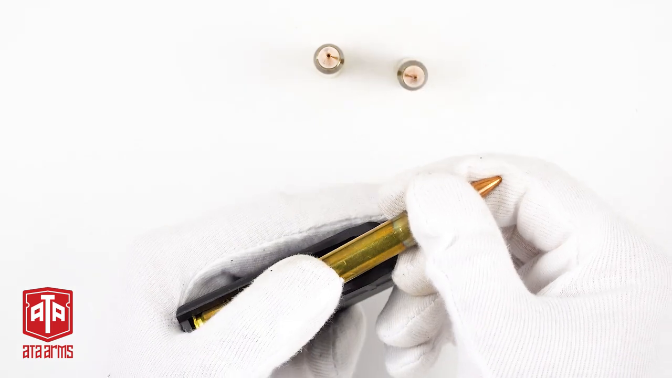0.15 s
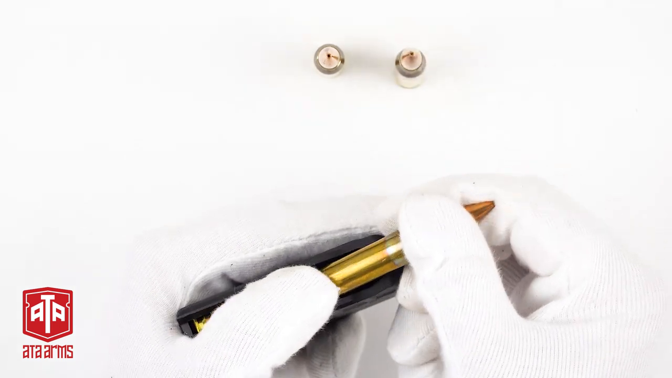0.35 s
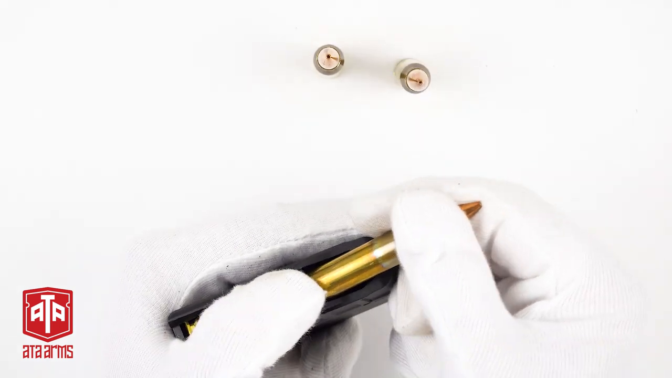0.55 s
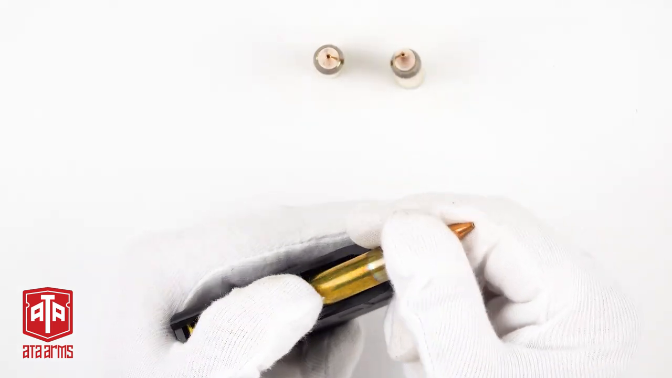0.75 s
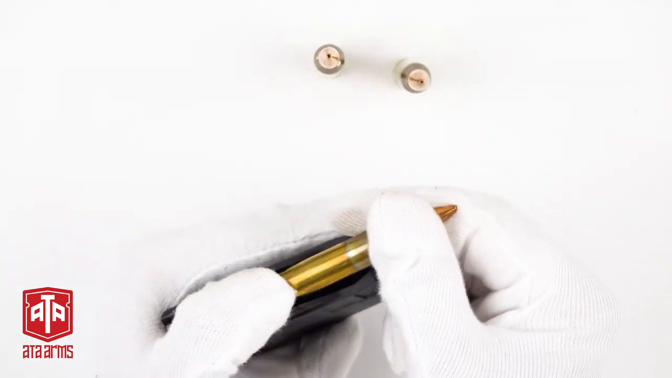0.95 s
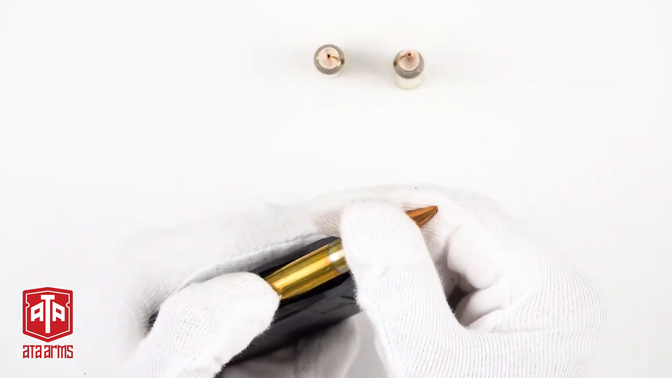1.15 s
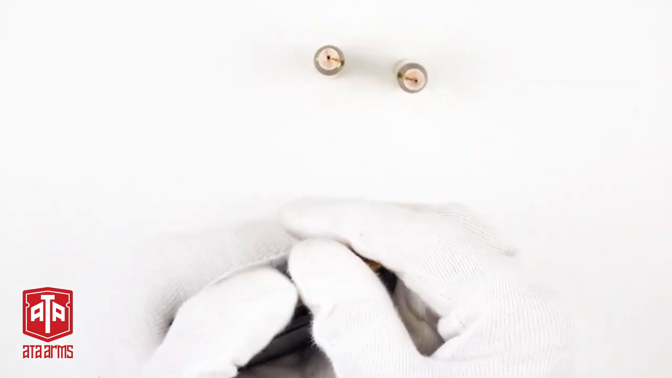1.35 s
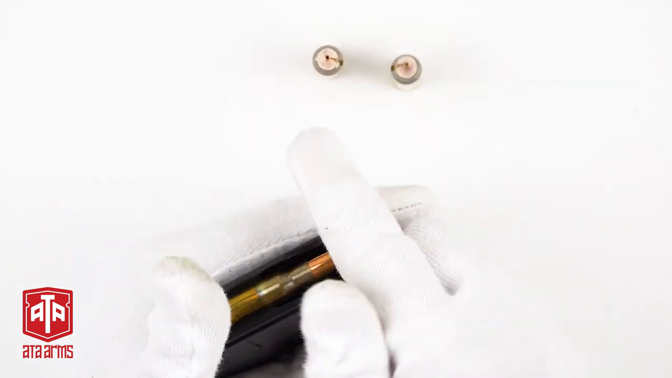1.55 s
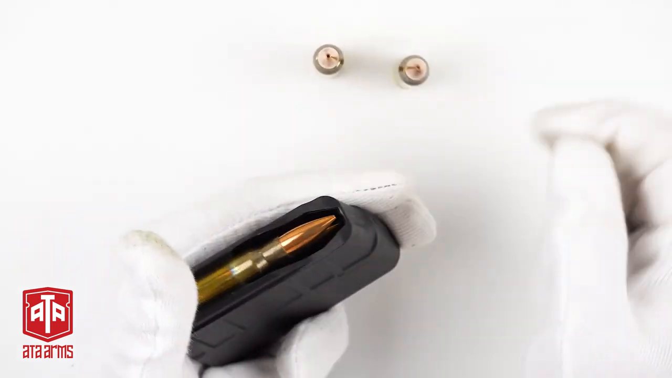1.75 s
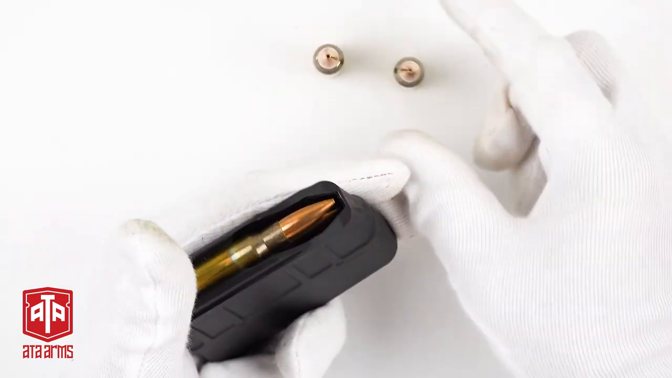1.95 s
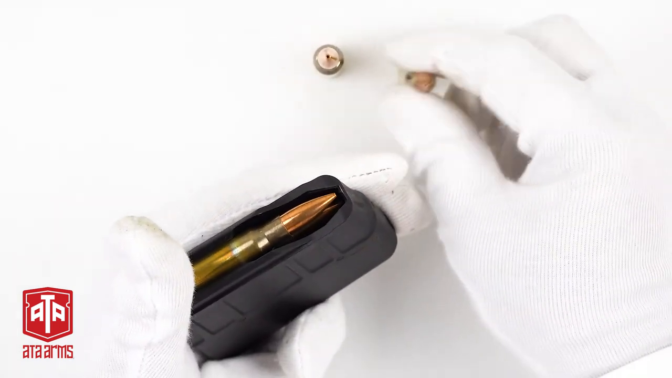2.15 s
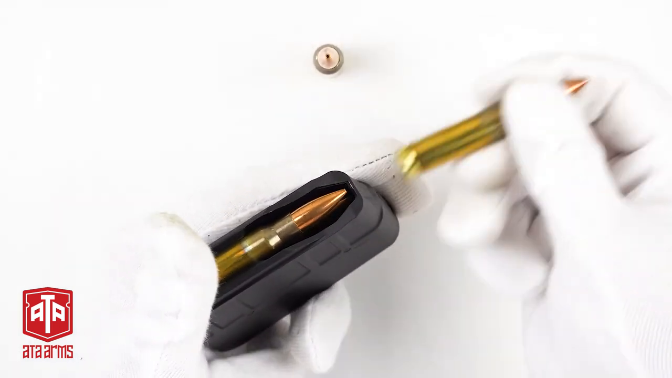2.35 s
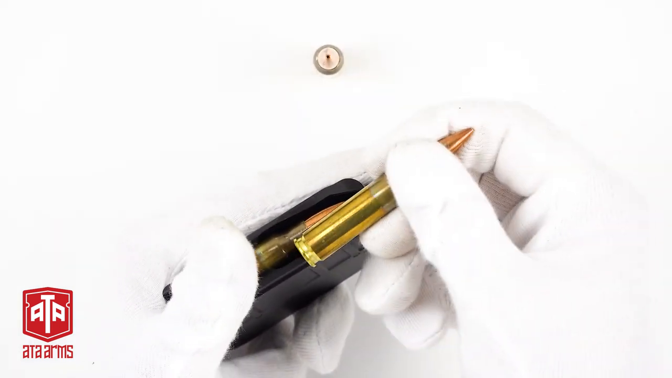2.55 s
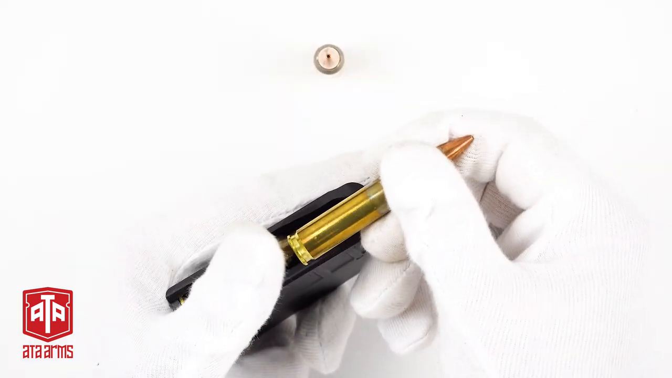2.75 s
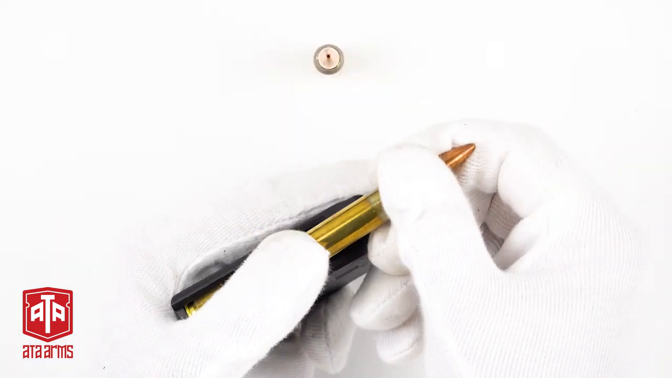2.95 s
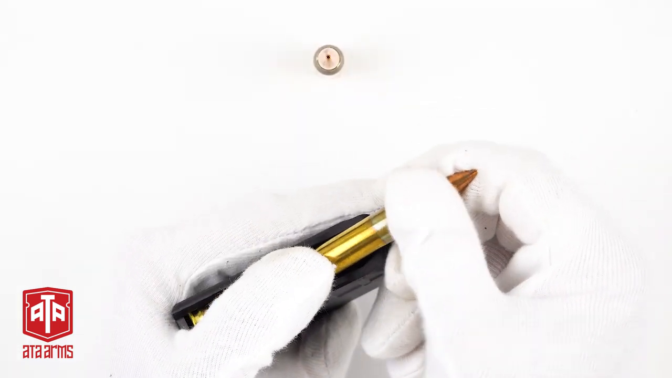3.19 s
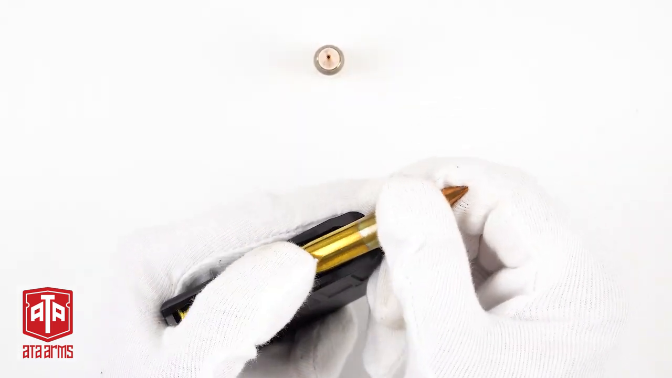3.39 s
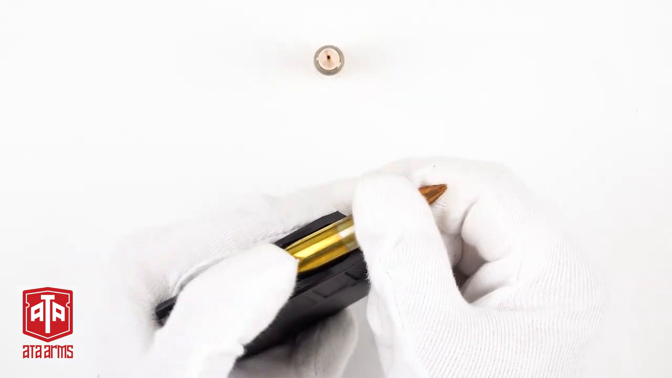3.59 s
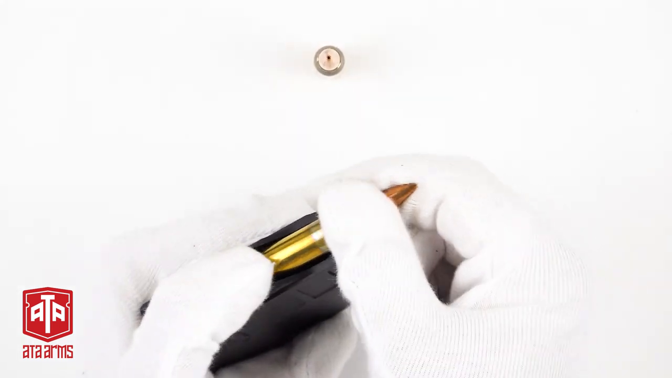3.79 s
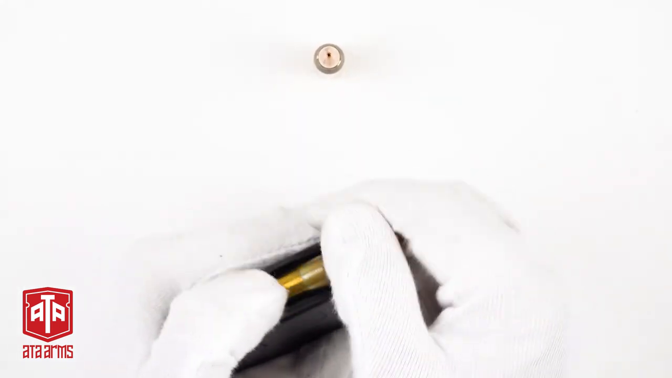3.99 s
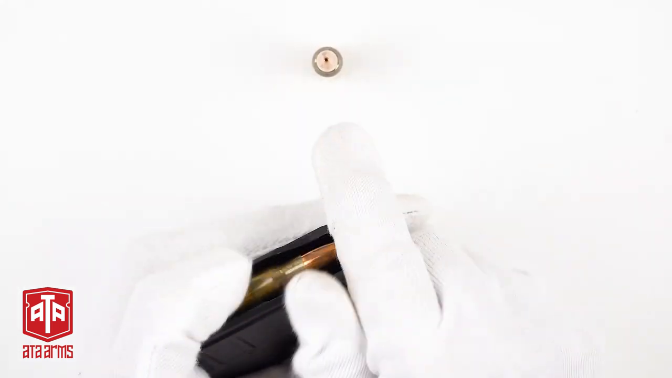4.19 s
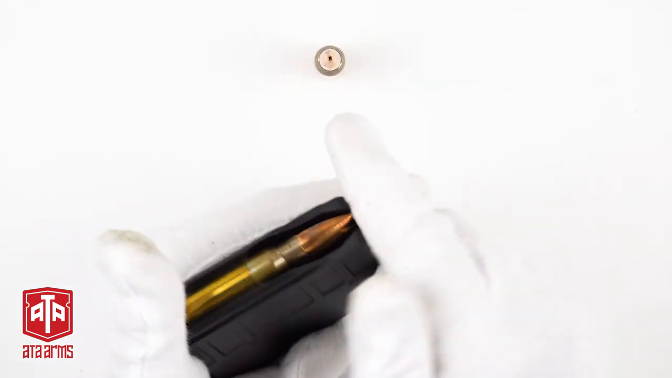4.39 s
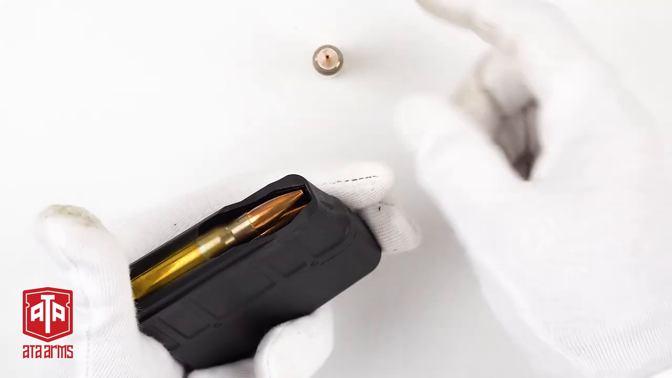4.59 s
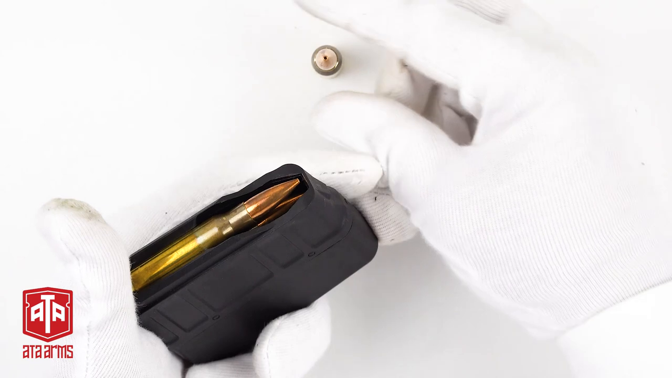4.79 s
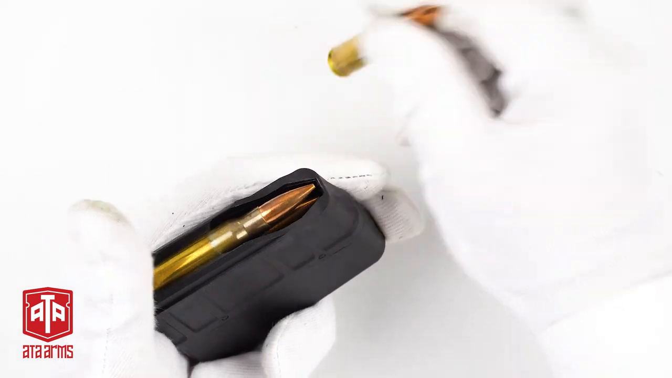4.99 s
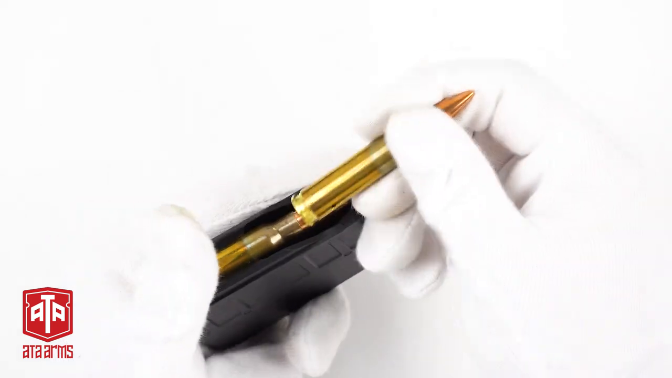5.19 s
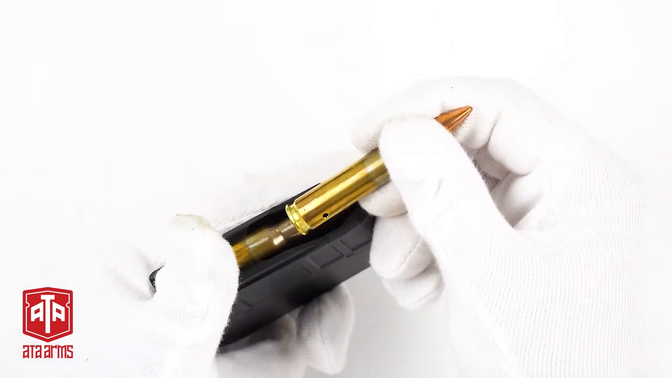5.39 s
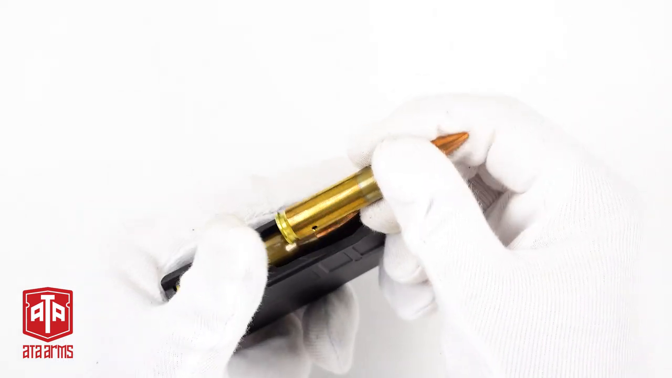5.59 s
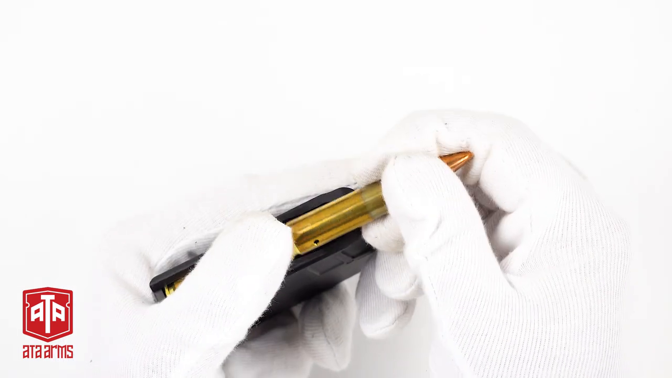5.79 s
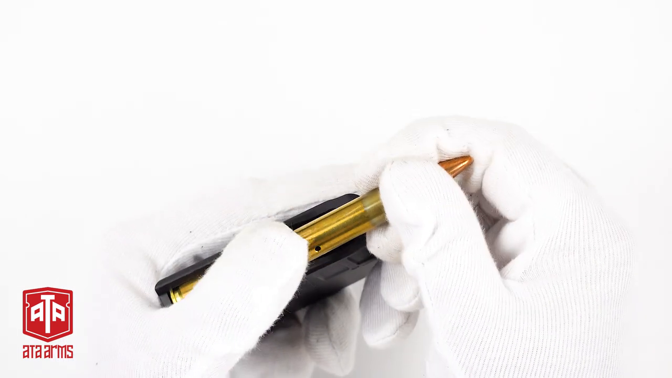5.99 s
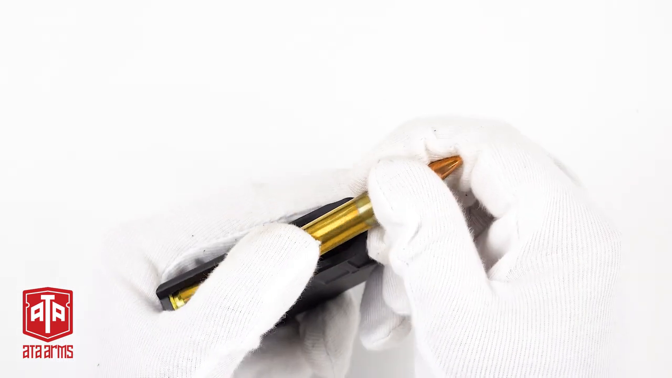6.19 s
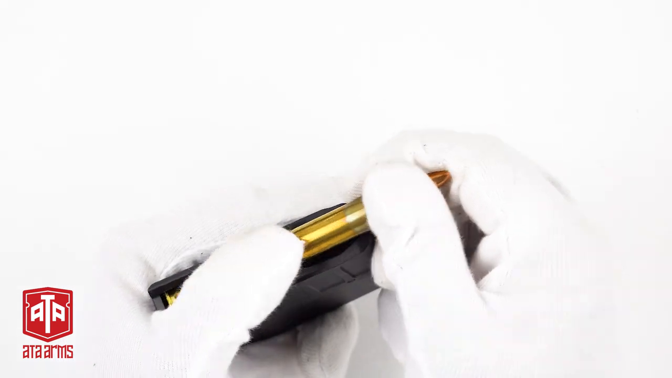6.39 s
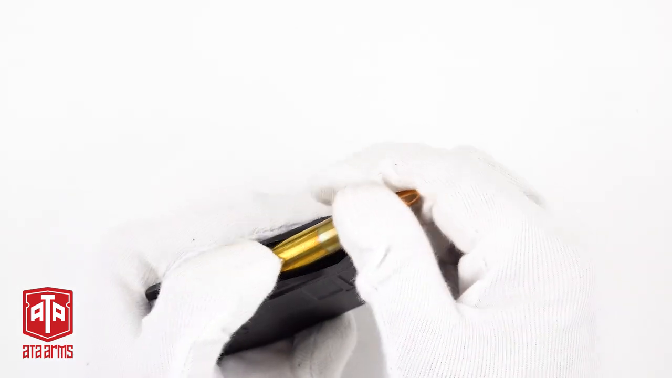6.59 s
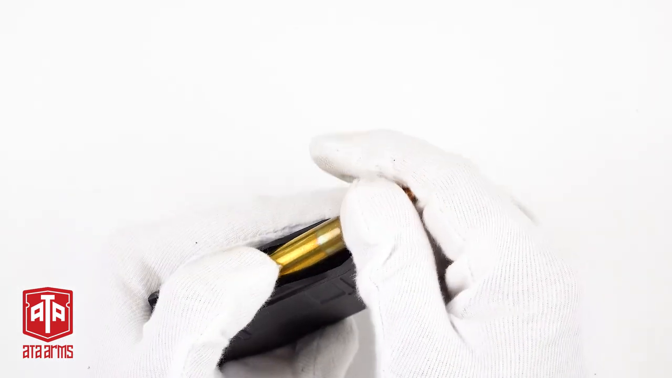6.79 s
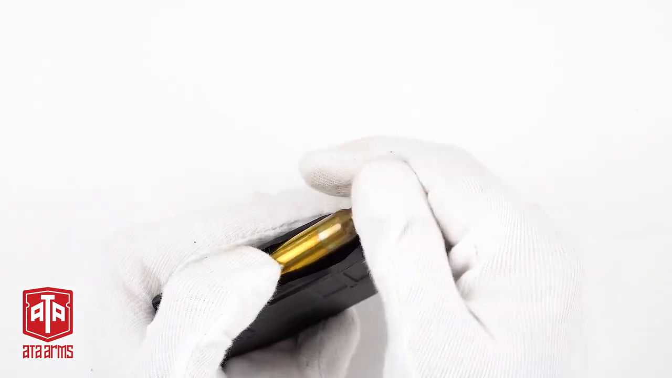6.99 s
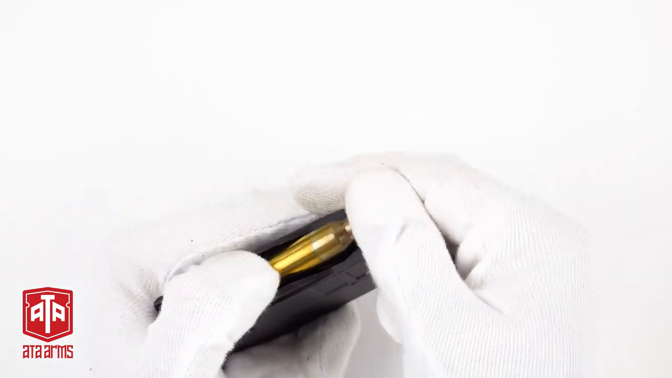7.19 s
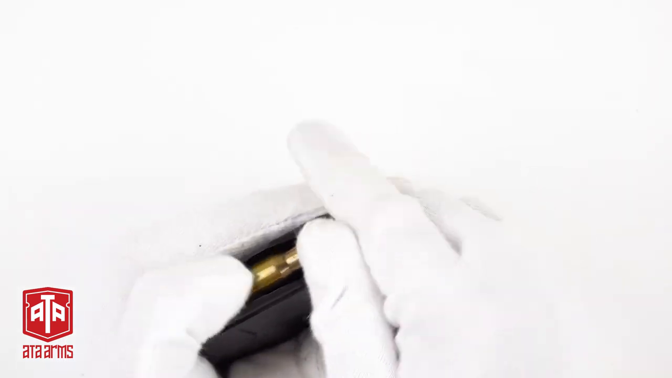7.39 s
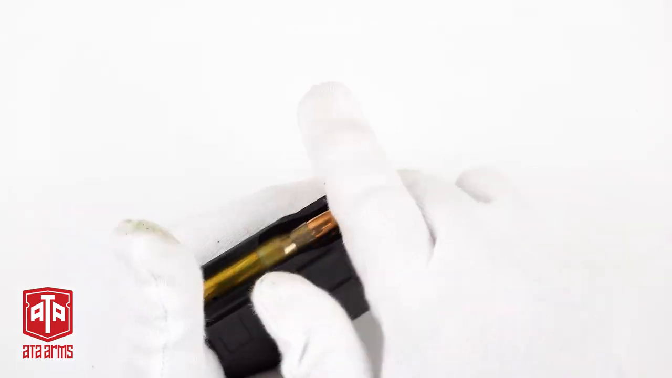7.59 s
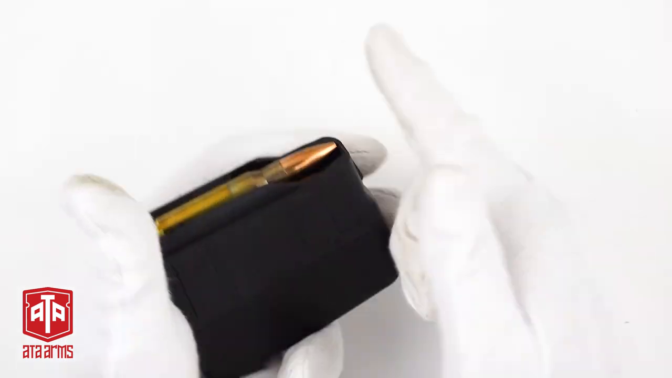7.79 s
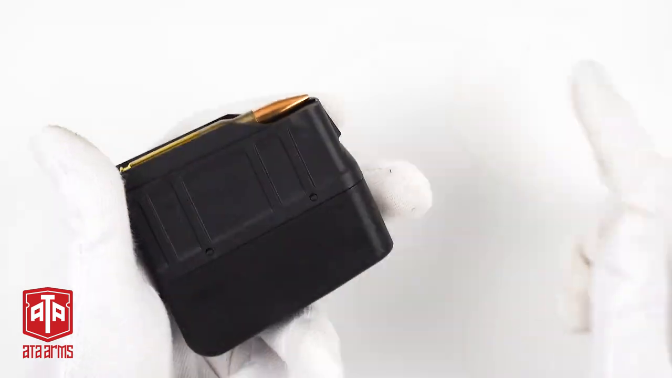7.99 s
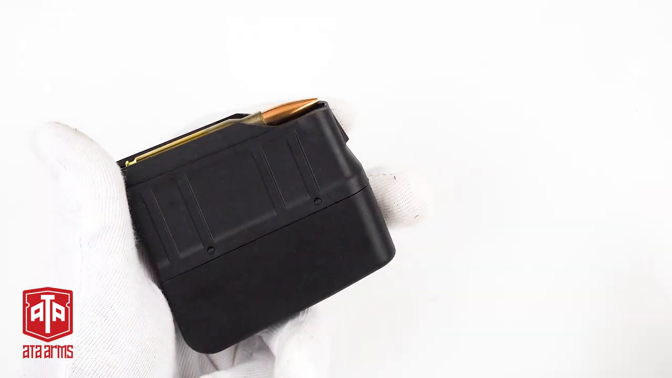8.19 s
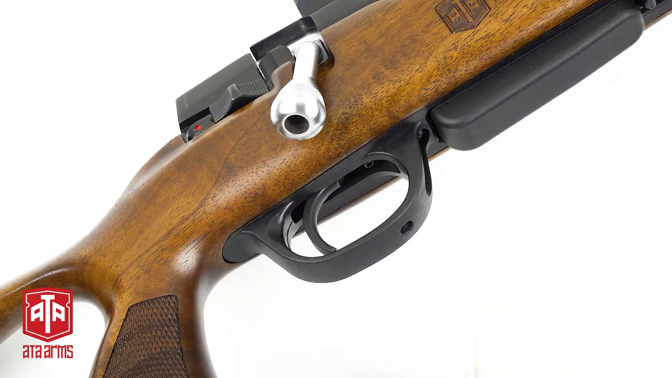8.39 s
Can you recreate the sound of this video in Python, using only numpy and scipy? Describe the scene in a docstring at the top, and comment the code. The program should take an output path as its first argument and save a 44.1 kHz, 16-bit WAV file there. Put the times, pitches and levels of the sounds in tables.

```python
"""In a small room, three brass rifle cartridges are pressed one by one into a hand-held plastic magazine.
Cases tick, click, scrape and snap home: random blows or stick-slip forces excite the magazine's resonances.
Light brass rubs and loose bumps ring in a few modes; soft knocks are filtered noise, and pushes ring the table.
Gloves rustle and hands rumble as coloured noise over a steady room tone with a faint hum.
A soft rush swells, gains a hiss and stops at the end."""
import sys
import numpy as np
from scipy import signal
from scipy.fft import rfft, irfft, next_fast_len
from scipy.io import wavfile
from scipy.ndimage import uniform_filter1d, map_coordinates

SR = 44100
rng = np.random.default_rng(int(sys.argv[2]) if len(sys.argv) > 2 else 0)


def store_pcm(level_fs):
    """Save levels as 16-bit WAV."""
    pcm = np.round(np.clip(level_fs, -1, 1) * 32767).astype(np.int16)
    wavfile.write(sys.argv[1], SR, np.atleast_2d(pcm).T)


N = 372644

# The five registers, from hollow body through wall, clack and brass ring to sharp edge.
# Each row: lower limit in Hz, upper limit in Hz.
REGISTERS = [(400, 1100), (1100, 1900), (1900, 4300), (4300, 7600), (7600, 15600)]
# The pushes of the hands that reach the table. Each row: start in seconds, relative level in dB.
THUMPS = [(0.987, -41), (1.274, -29), (1.39, -36), (3.657, -34), (3.959, -29), (4.028, -35), (6.501, -35),
          (6.637, -35.5), (7.219, -33.5), (7.349, -37.5), (7.76, -46.5)]


def contacts(rise=0.0006, blow_t60=0.013, rattle_t60=0.043, rattle=0.5, loose_calm=0.35):
    """Impact excitation: a hard blow of about 2 ms and a short rattle of the stack, less for a loose case."""
    # Hard contacts of a case with the lips, the spring or the stack; the spot struck favours two resonances,
    # hardness lifts the treble, body the hollow of the shell. Each row: time in seconds, strength in dB,
    # clack in Hz, ring in Hz, hardness in dB, body in dB.
    blows = [(0.028, -47.5, 3400.0, 4640, 3, 0.5), (0.2, -48, 3370, 4250.0, 1.0, 7.0),
             (0.22, -50, 1610, 7760, 10.5, 14.5), (0.3011, -37.5, 1540.0, 4370, 10.0, 6),
             (0.308, -41.5, 1520, 4530, 15, 15), (0.568, -53, 2430, 4350.0, -16, 5),
             (0.9606, -36.5, 2630, 5350.0, -6, 10.5), (0.99, -26.5, 2630, 4180, 11.5, 8),
             (1.2748, -17.5, 2590, 4530.0, -2.5, -5.5), (1.2788, -18, 3830, 4270, 3.5, -5.5),
             (1.3046, -25.0, 2540, 4140, 6.5, -0.5), (1.384, -33.5, 1610.0, 4590.0, -1, 1.5),
             (1.417, -30.5, 2010.0, 5800, -3.5, 6.5), (1.4936, -47.0, 2230.0, 4310.0, 2, 20.5),
             (2.6416, -27.0, 1830.0, 5320.0, -10.5, -3.5), (2.698, -28.0, 2780, 6270, 15.5, -2),
             (3.067, -34, 2510, 4410, -3.0, 3), (3.2723, -50.5, 2450, 5090, -13.0, 12.5),
             (3.537, -41, 1030, 7220.0, 8, 15.5), (3.6656, -27.0, 2980.0, 4740.0, 6, -10.5),
             (3.786, -56.5, 1030, 4360, 16, 22.5), (3.8386, -49.5, 2340.0, 4640.0, 6.5, 9),
             (3.8784, -50.0, 2350, 4500.0, -0.5, 15.0), (3.9579, -16.5, 2460.0, 5900, 2, -6.5),
             (3.964, -18.5, 3386, 6196, 11, 5.5), (3.9704, -20.5, 1560.0, 5810.0, 1, 7.0),
             (3.99, -16.0, 2220, 6000.0, -7.0, -3), (3.9947, -28.5, 2420.0, 6100, 5, 12.5),
             (4.116, -39.5, 2350, 5780.0, -1.5, 2.5), (5.311, -28, 2350, 5600.0, 11.0, 0.5),
             (5.3621, -25.5, 2350, 5660, -5, -11), (5.4909, -46.5, 2700, 4290, 11.0, 0),
             (5.609, -27, 2430, 5790, 16, -3), (5.688, -39.5, 2410, 5820.0, -21.0, 2.5),
             (5.9218, -48, 2370.0, 5640.0, -18.5, 8.5), (6.216, -39.0, 3050, 5820.0, -9, 1),
             (6.2473, -43.5, 1270.0, 4650.0, -5, 6.5), (6.3098, -24.0, 2490, 4830, 2, -5.5),
             (6.355, -35.5, 2570, 4690.0, -14, 9.0), (6.469, -38, 3260, 4400, 5.5, -4),
             (6.628, -47, 1170.0, 4750.0, 3, 11.5), (6.648, -22.5, 2400, 5930, -3.5, -3),
             (7.2225, -14.0, 3080, 8400, 11.5, -8.5), (7.225, -15.5, 3080, 8270.0, 5, -7.5),
             (7.259, -24.5, 3090.0, 6100.0, 2, -1.0), (7.3302, -24, 2230, 4370, 4, 5),
             (7.334, -25, 2050, 5080.0, 2, 2), (7.3587, -25.0, 3160, 4380, 7, 1.0)]
    track, t = np.zeros(N), seconds(0.04)
    for s, strength_db, clack_hz, ring_hz, hardness_db, body_db in blows:
        loose = looseness(s)
        stack = rattle * (1 - loose_calm * loose) * amp(-60 * t / rattle_t60)
        envelope = (1 - np.exp(-t / rise)) * (amp(-60 * t / blow_t60) + stack)
        levels_db = voiced(strength_db, clack_hz, ring_hz, hardness_db, body_db)
        click = magazine(chatter(envelope), levels_db, 0.01, loose, (clack_hz, ring_hz))
        add(track, s - rise, in_room(click, wet_db=0.5))
    return track


def magazine(force, levels_db, length, loose, favoured_hz=(), favour_db=8, wall_db=-12, clearing_db=13, count=3):
    """Source-filter principle: a force excites the body's modes, with a set energy in each register."""
    # Resonances of the loaded magazine. Each row: frequency in Hz, half-width in Hz, level in dB.
    body_modes = [(752, 130, -0.5), (1134, 130, -6.5), (1360, 220, -2), (1580, 93, -2.5), (2020, 270, -2.5),
                  (2426, 290, -1), (3078, 75, -1.5), (3400, 180, -1.5), (3820, 240, -3), (4602, 370, -5.5),
                  (5300, 530, -5), (5830, 270, -2), (6420, 160, -2), (6990, 200, -1.5), (8080, 370, -1),
                  (8980, 820, -5), (10130, 370, -6), (11570, 320, -7.5), (12400, 330, -2.5),
                  (14700, 480, -8.5)]
    f = np.fft.rfftfreq(2048, 1 / SR)
    modes = list(body_modes) + [(hz, 160, favour_db * loose) for hz in favoured_hz]
    hz, width, db = np.transpose(modes)[:, :, None]
    # every contact finds the modes slightly shifted
    pitch = hz * (1 + 0.012 * rng.standard_normal(hz.shape))
    strength = amp(db + 2.5 * rng.standard_normal(hz.shape))
    power = np.sum(strength ** 2 / (1 + ((f - pitch) / width) ** 2) ** 2, axis=0)
    # a pressed case cracks without pitch
    power += amp(wall_db - clearing_db * loose) ** 2 / (1 + (f / 7000) ** 2)
    # so small a body radiates little bass
    power *= f ** 4 / (f ** 4 + 380 ** 4)
    wanted = amp(levels_db) ** 2 * length * SR
    centres = np.sqrt(np.prod(REGISTERS, axis=1))
    for _ in range(count):  # tilt the spectrum smoothly to bring each register towards its energy
        held = np.array([power[(f >= low) & (f < high)].sum() for low, high in REGISTERS]) / len(f)
        power *= np.exp(along(np.transpose([centres, np.log(wanted / held)]), f))
    return signal.fftconvolve(force / np.linalg.norm(force), causal(np.sqrt(power)))


def voiced(strength_db, clack_hz, ring_hz, hardness_db, body_db):
    """Contact spectrum: strength, hardness and body set the level of each register in dB."""
    # One row for each register: base level in dB at the usual strength, growth in dB per dB of strength,
    # share of hardness, share of body.
    voicing = [(-40.5, 1, 0, 1), (-40, 1.25, 0.029, 0.77), (-30.5, 1, 0, 0), (-45.5, 1, 0.9, 0),
               (-48.5, 1, 1.07, 0)]
    usual_strength_db = -30
    # a favoured resonance lifts the register around it
    clack_lift_db, ring_lift_db, lift_octaves = 2.5, 9.5, 0.52
    base_db, growth, hard, hollow = np.transpose(voicing)
    centres = np.sqrt(np.prod(REGISTERS, axis=1))

    def near(hz):
        return np.exp(-(np.log2(centres / hz) / lift_octaves) ** 2)

    levels_db = base_db + growth * (strength_db - usual_strength_db)
    levels_db = levels_db + hard * hardness_db + hollow * body_db
    return levels_db + clack_lift_db * near(clack_hz) + ring_lift_db * near(ring_hz)


def looseness(s):
    """Contact damping: the grip exponentially reduces how freely the case can ring at time s (0-1)."""
    # Each cartridge is laid on loosely, then gripped by the thumb.
    # Each row: time laid in seconds, time gripped in seconds.
    cartridges = [(0, 0.028), (2.6, 2.85), (5.25, 5.8)]
    grip_s, pressed_looseness = 0.52, 0.12  # time constant in seconds, lower limit
    _, gripped = cartridges[sum(s >= row[0] for row in cartridges[1:])]
    free = np.exp(-max(s - gripped, 0) / grip_s)
    return np.clip(pressed_looseness + (1 - pressed_looseness) * free, 0, 1)


def chatter(envelope, count=2):
    """Broadband excitation: a random force follows the envelope with a nearly flat spectrum."""
    force = rng.standard_normal(len(envelope)) * envelope
    for _ in range(count):
        force = irfft(np.exp(1j * np.angle(rfft(force))), len(envelope))  # keep phase, level the spectrum
        force *= envelope / np.sqrt(np.abs(uniform_filter1d(force ** 2, size=48)) + 1e-14)
    return force


def bumps(rise=0.00038):
    """Modal ringing: a loosely held cartridge sounds briefly in a few decaying sines."""
    # The last cartridge bumps on the one below. Each row: start in seconds, level in dB.
    touches = [(5.312, -25), (5.363, -26.5), (5.4914, -33.5)]
    # Modes of the case. Each row: frequency in Hz, level in dB, decay time t60 in seconds.
    case_modes = [(1097, 0.5, 0.022), (2704, 0.5, 0.03), (4400, -3.5, 0.029)]
    track, t = np.zeros(N), seconds(0.1)
    for s, db in touches:
        ring = np.zeros(len(t))
        for hz, level, t60 in case_modes:
            ring += amp(level + rng.normal(0, 1) - 60 * t / t60) * np.sin(2 * np.pi * hz * t)
        add(track, s, in_room(amp(db) * ring * (1 - np.exp(-t / rise)), wet_db=-4.5))
    return track


def scrapes(grit_db=3.5, roundness=0.55):
    """Stick-slip friction: sliding brass gives a dense run of tiny blows of uneven size."""
    # A case slides under the lips. Each row: start in seconds, length in seconds, strength in dB,
    # hardness in dB, body in dB.
    slides = [(0.331, 0.11, -57.0, 0.5, 8), (0.727, 0.062, -69, -3.5, 19.0), (0.977, 0.012, -39, 5.5, -8.5),
              (1.265, 0.033, -27.5, 8.5, 6), (1.295, 0.018, -27.0, 7, 3.5), (3.094, 0.11, -59.5, 8, 15),
              (3.517, 0.028, -53, 7.0, 18), (3.659, 0.018, -33, -1, -7), (3.686, 0.066, -55.5, 7, 11),
              (3.78, 0.088, -58, 8.5, 10.0), (3.949, 0.044, -26, 5.5, 2), (6.503, 0.024, -47.5, 12.5, 10.5),
              (6.641, 0.0085, -41.5, -1.5, 12.0), (7.2168, 0.023, -25.0, 10.5, 3.5),
              (7.238, 0.052, -27.5, 13.5, 2.5)]
    clack_hz, ring_hz = 2500, 4440  # the resonances that sliding favours
    track, t = np.zeros(N), seconds(0.16)
    for s, length, strength_db, hardness_db, body_db in slides:
        slips = amp(grit_db * unit(uniform_filter1d(rng.standard_normal(len(t)), size=60)))
        pressure = np.abs(np.sin(np.pi * np.minimum(t / length, 1))) ** roundness
        levels_db = voiced(strength_db, clack_hz, ring_hz, hardness_db, body_db)
        slide = magazine(chatter(slips * pressure), levels_db, length, looseness(s))
        add(track, s, in_room(slide, wet_db=3.5))
    return track


def squeaks(sharpness=14):
    """Friction-driven resonance: a light rub excites one narrow band of the case."""
    # Brass rubs lightly on brass. Each row: start in seconds, length in seconds, level in dB, pitch in Hz.
    rubs = [(4.208, 0.061, -55, 3320), (5.784, 0.039, -61, 3440), (5.85, 0.067, -58.5, 3280),
            (7.112, .012, -59, 3530)]
    track, t = np.zeros(N), seconds(0.1)
    for s, length, db, pitch_hz in rubs:
        rub = rng.standard_normal(len(t))
        tone = unit(filtered(rub, lambda hz: 1 / (1 + (sharpness * (hz / pitch_hz - 1)) ** 2)))
        pressure = np.sin(np.pi * np.minimum(t / length, 1))
        add(track, s, in_room(amp(db) * tone * pressure, wet_db=-0.5))
    return track


def knocks(rise=0.002, t60=0.045, sharpness=5.3, tick=0.17, tick_t60=0.015, echo_s=0.012, echo=0.55):
    """Damped resonance: soft contacts give a dull tick and a puff with an early echo and much room."""
    # Each row: start in seconds, relative level in dB, pitch in Hz.
    soft_contacts = [(0.039, -38.5, 750), (0.284, -36.5, 850), (0.489, -36.5, 774), (0.711, -34, 784),
                     (0.918, -38.5, 596), (1.114, -40.5, 590), (1.661, -38.5, 814), (1.858, -38.5, 570),
                     (2.047, -42, 480), (2.175, -41, 482), (2.242, -30, 479), (4.349, -44, 950),
                     (4.416, -43.5, 760), (4.468, -39.5, 856), (4.537, -38, 854), (4.601, -39, 760),
                     (4.686, -38, 723), (4.76, -44.5, 850), (4.859, -44, 829), (4.952, -38.5, 830),
                     (4.994, -33.5, 665)]
    # Spectrum of a soft contact. Each row: frequency in Hz, relative level in dB.
    dull_spectrum = [(100, -20.5), (300, -0.5), (420, 2.5), (800, -1), (1500, -5.5), (2300, -9),
                     (5000, -21.5), (12000, -28.5)]
    track, t = np.zeros(N), seconds(0.15)
    envelope = (1 - np.exp(-t / rise)) * amp(-60 * t / t60)

    def colour(hz):
        return amp(along(dull_spectrum, hz))

    for s, db, pitch_hz in soft_contacts:
        def resonance(hz):
            return 0.18 + 1 / np.hypot(1, sharpness * (hz / pitch_hz - pitch_hz / (hz + 1)))

        force = chatter(envelope)
        add(force, echo_s, echo * chatter(envelope))
        puff = unit(filtered(force, lambda hz: resonance(hz) * colour(hz)))
        touch = unit(filtered(chatter(amp(-60 * t / tick_t60)), colour))
        add(track, s, in_room(amp(db - 18) * (puff + tick * touch), wet_db=4.5))
    return track


def thumps(rise=0.004):
    """Modal superposition: every hard push rings the low modes of the table top."""
    # Each row: frequency in Hz, level in dB, decay time t60 in seconds.
    table_modes = [(70.4, 1.5, 0.28), (90, -8, 0.58), (125.7, -2.5, 0.27), (161, -10.5, 0.099),
                   (195, -15.5, 0.11)]
    track, t = np.zeros(N), seconds(0.5)
    for s, db in THUMPS:
        ring = np.zeros(len(t))
        for hz, level, t60 in table_modes:
            decay = amp(level + rng.normal(0, 2) - 60 * t / t60)
            ring += decay * np.sin(2 * np.pi * (hz * t + rng.random()))
        add(track, s, amp(db - 3) * ring * (1 - np.exp(-t / rise)))
    return track


def gloves(flutter_db=2):
    """Friction noise: cotton rubs on the plastic, and each stroke swells and fades."""
    # Each row: middle in seconds, length (two standard deviations) in seconds, level in dB.
    glove_strokes = [(0.368, .12, -59), (1.655, 0.28, -61.5), (2.4, .13, -64), (3.168, 0.13, -64.5),
                     (3.4, 0.11, -60.5), (4.202, 0.15, -54), (4.904, 0.98, -64.5), (6.329, 0.15, -56),
                     (6.53, 0.12, -60.5), (6.85, 0.19, -63.5), (7.78, 0.37, -58), (8.247, 0.32, -63)]
    # Spectrum of the cloth. Each row: frequency in Hz, relative level in dB per Hz.
    cloth_spectrum = [(200, -20.5), (500, -6.5), (720, 1.5), (1000, -3), (2500, -1), (5000, -5),
                      (9000, -7.5), (15000, -20)]
    holding_db = -79  # the gloves at rest
    t = np.arange(N) / SR
    strokes = sum((amp(db) * np.exp(-2 * ((t - s) / length) ** 2)) ** 2 for s, length, db in glove_strokes)
    level = np.sqrt(strokes + amp(holding_db) ** 2)
    return level * amp(flutter_db * wobble(25)) * noise(cloth_spectrum)


def hands():
    """Modulated low-frequency noise: a faint rumble builds up to each push and dies away after it."""
    # Each row: frequency in Hz, relative level in dB per Hz.
    rumble_spectrum = [(15, -8.5), (30, 1), (48, -8.5), (66, 3), (80, -4.5), (105, -8), (126, -1.5),
                       (155, -15.5), (200, -17), (400, -39.5), (1000, -89)]
    push_db, resting_db = -18.5, -66  # relative to each push, and level at rest
    rise_s, fall_s = 0.16, 0.27
    t = np.arange(N) / SR
    power = amp(resting_db) ** 2
    for s, db in THUMPS:
        nearness = np.exp(-np.maximum((s - t) / rise_s, (t - s) / fall_s))
        power = power + (amp(db + push_db) * nearness) ** 2
    return np.sqrt(power) * noise(rumble_spectrum)


def air():
    """Stationary and swelling noise: room tone and faint hum, with a closing rush that gains a hiss."""
    # Four spectra. Each row: frequency in Hz, relative level in dB per Hz.
    room_spectrum = [(24, -32.5), (40, -2), (117, -3), (188, -1.5), (253, -9.5), (522, -12), (758, -13.5),
                     (1020, -18), (2330, -20.5), (4130, -24), (5720, -23), (13700, -30.5), (15500, -33.5)]
    hum_spectrum = [(120, -40), (175, -13), (200, 2), (225, -16), (300, -39.5), (1000, -89.5)]
    rush_spectrum = [(100, -13), (200, -3), (400, 2), (600, -10), (900, 1), (1100, -11), (1350, 1),
                     (1700, -16.5), (5000, -32.5), (15000, -42)]
    hiss_spectrum = [(1000, -21.5), (4000, -5.5), (9000, 0), (15000, -8.5)]
    steady = amp(-62) * noise(room_spectrum) + amp(-71) * noise(hum_spectrum)
    rush = swell(start_s=7.67, level_db=-62.5, db_per_s=9) * noise(rush_spectrum)
    hiss = swell(start_s=8.123, level_db=-57.5, db_per_s=23) * noise(hiss_spectrum)
    return steady + rush + hiss


def swell(start_s, level_db, db_per_s):
    """Exponential growth: a gain opens at start_s, rises steadily in dB and shuts when the rush stops."""
    stop_s, edge_s = 8.345, 0.024
    t = np.arange(N) / SR
    gate = np.clip(np.minimum(t - start_s, stop_s - t) / edge_s, 0, 1)
    return gate * amp(level_db + db_per_s * (t - start_s))


def in_room(sound, wet_db):
    """Reverberation: the direct sound and a diffuse tail of noise that decays at its own rate in each band."""
    # Decay of the room. Each row: frequency in Hz, decay time t60 in seconds.
    room_t60 = [(150, 0.77), (720, 0.24), (1400, 0.45), (2500, 0.4051), (6000, 0.34), (10000, 0.26),
                (15000, 0.38)]
    # Energy of the tail before wet_db. Each row: frequency in Hz, level in dB.
    tail_level = [(150, -2), (500, -7), (720, -5.5), (1000, -6), (1500, -6), (3000, -11), (6000, -8),
                  (9000, -11), (15000, -11.5)]
    hz, t, z = signal.stft(rng.standard_normal(SR // 2), SR, nperseg=256)
    fade = amp(-60 * t / along(room_t60, hz)[:, None])
    fade *= 1 - np.exp(-t / 0.00067)  # the tail builds up
    energy = np.sum(fade ** 2, axis=1, keepdims=True) * t[1] * SR
    fade *= amp(along(tail_level, hz) + wet_db)[:, None] / np.sqrt(energy)
    answer = signal.istft(z * fade, SR, nperseg=256)[1]
    answer[0] += 1  # direct sound
    return signal.fftconvolve(sound, answer)


def causal(gain):
    """Minimum phase: the cepstrum gives an impulse response with this gain that starts at once."""
    cepstrum = irfft(np.log(gain + 1e-6))
    half = len(cepstrum) // 2
    cepstrum[1:half] *= 2
    cepstrum[half + 1:] = 0
    return irfft(np.exp(rfft(cepstrum)))


def noise(spectrum, size=N):
    """Spectral shaping: white noise is coloured and scaled to rms 1."""
    return unit(filtered(rng.standard_normal(size), lambda hz: amp(along(spectrum, hz))))


def filtered(x, gain):
    """Linear filtering: the spectrum of x is multiplied by a gain that depends on frequency."""
    m = next_fast_len(len(x) + 8192)
    return irfft(rfft(x, m) * gain(np.fft.rfftfreq(m, 1 / SR)), m)[:len(x)]


def wobble(rate):
    """Slow random modulation: a smooth curve through rate random knots a second."""
    knots = rng.standard_normal(int(N * rate / SR) + 4)
    return map_coordinates(knots, [np.arange(N) * rate / SR])


def add(track, s, sound):
    """Superposition: mix a sound into the track at time s."""
    part = track[max(round(s * SR), 0):][:len(sound)]
    part += sound[:len(part)]


def along(points, hz):
    """Logarithmic pitch scale: read (Hz, value) points on a log frequency axis."""
    f, v = np.transpose(points)
    return np.interp(np.log(hz + 1), np.log(f), v)


def amp(db):
    """Level law: decibels to amplitude gain."""
    return 10 ** (np.asarray(db) / 20)


def unit(x):
    """Power normalisation: scale to rms 1."""
    return x / np.sqrt(np.mean(x ** 2) + 1e-20)


def seconds(length):
    """Sampling: a time axis of this length in seconds."""
    return np.arange(int(length * SR)) / SR


def scene():
    """Superposition: all sources add at one microphone."""
    cartridges = contacts() + bumps() + scrapes() + squeaks()
    surroundings = knocks() + thumps() + gloves() + hands() + air()
    return (cartridges + surroundings)[None]


def record(dry):
    """Saturation and band-limiting: the loudest snaps flatten at full scale, then the top is cut steeply."""
    top_hz = 15750
    flattened = dry[0] / (1 + np.abs(dry[0]) ** 6) ** (1 / 6)
    return filtered(flattened, lambda hz: 1 / np.sqrt(1 + (hz / top_hz) ** 160))[None]


dry = scene()
out = record(dry)
store_pcm(out)
```